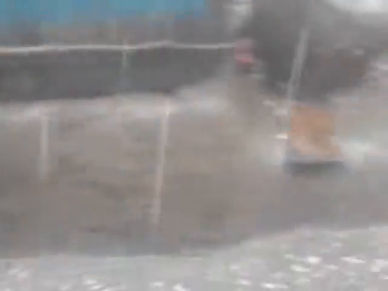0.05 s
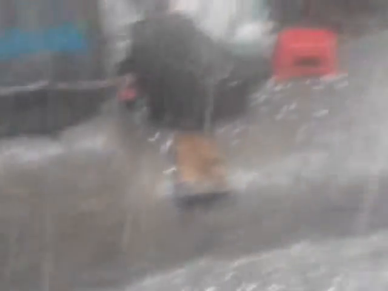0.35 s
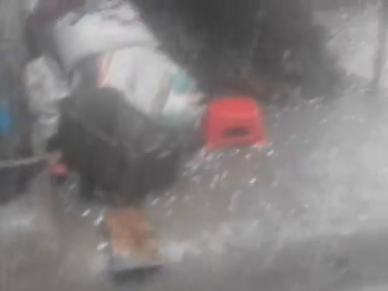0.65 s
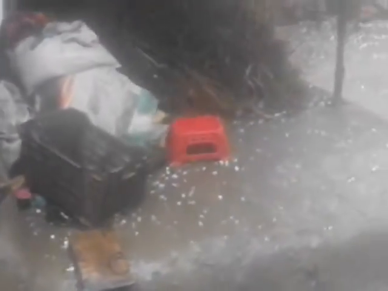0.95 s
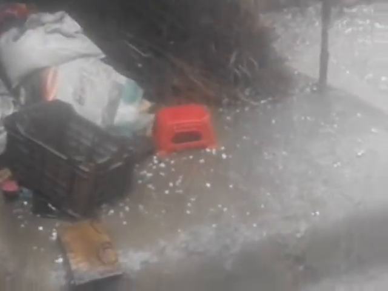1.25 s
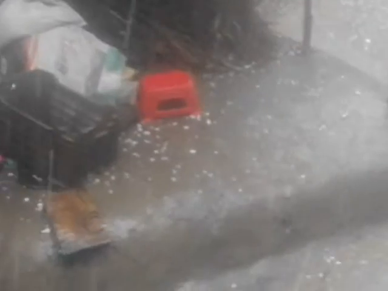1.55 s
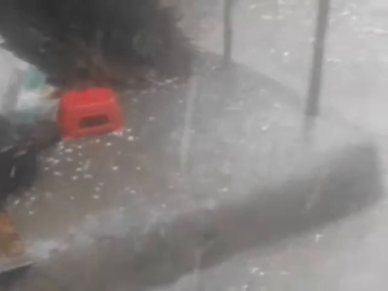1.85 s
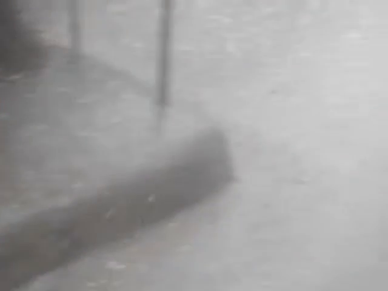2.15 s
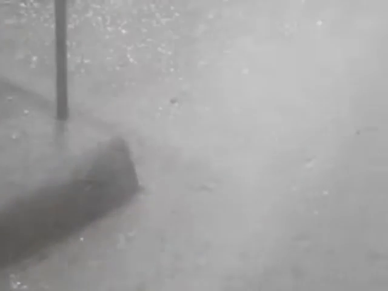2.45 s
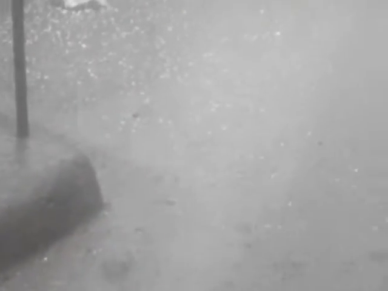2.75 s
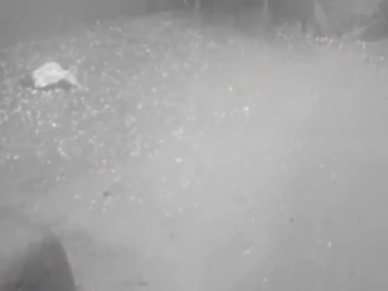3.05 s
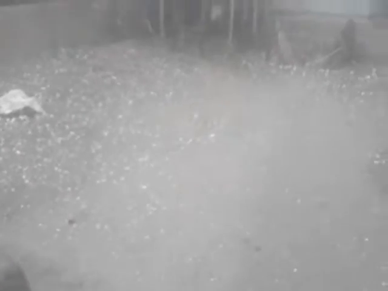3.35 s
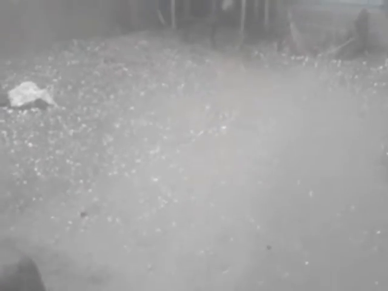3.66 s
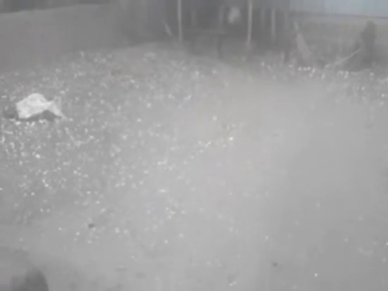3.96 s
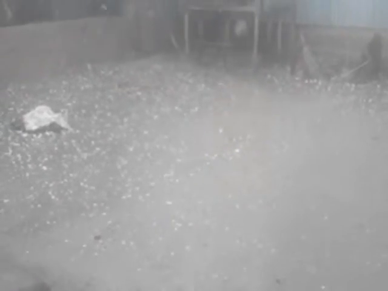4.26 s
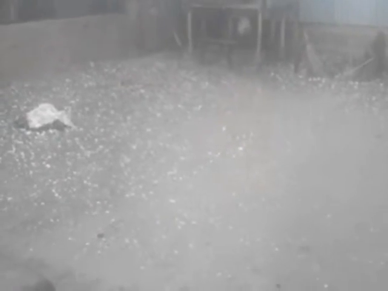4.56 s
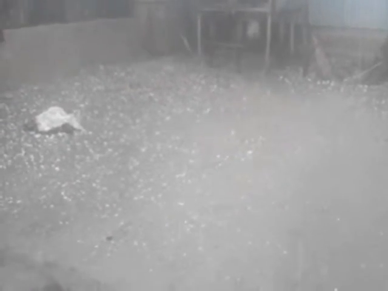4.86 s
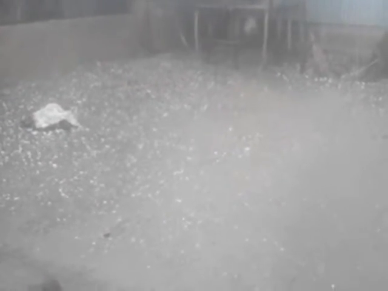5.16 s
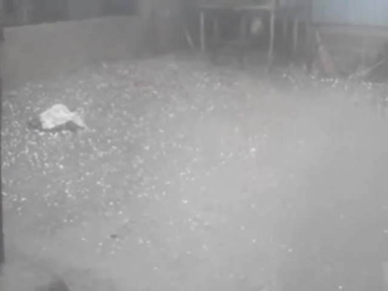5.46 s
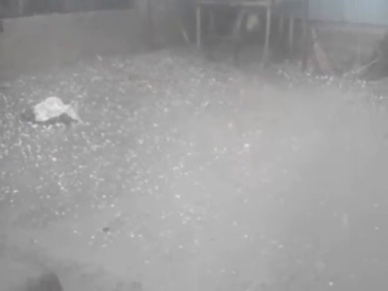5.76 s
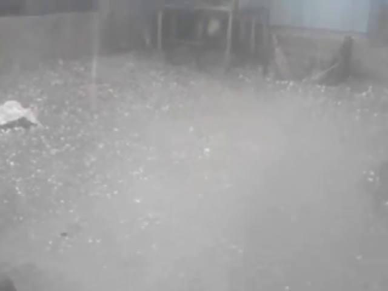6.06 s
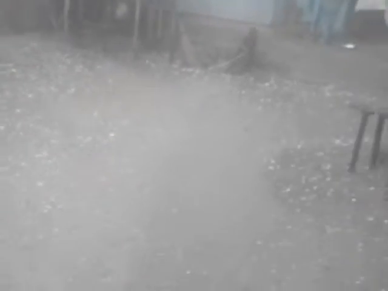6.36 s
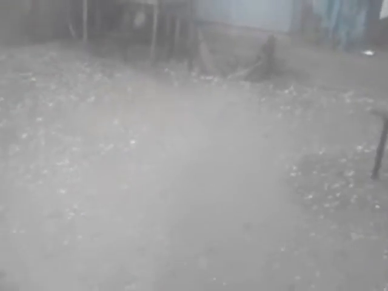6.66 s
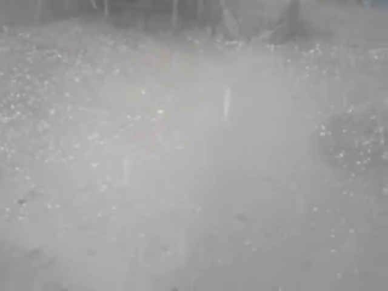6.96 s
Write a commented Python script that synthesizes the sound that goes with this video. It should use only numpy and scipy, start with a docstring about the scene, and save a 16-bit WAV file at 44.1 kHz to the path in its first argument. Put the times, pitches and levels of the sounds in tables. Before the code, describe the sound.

A dense, bright hiss of hail and rain on wet paving, with nearby hailstones ticking, splashing and knocking on crates and boards.

```python
"""Hail on a flooded yard

A cloudburst of hail and rain on flooded paving, heard from under the eaves. Far stones merge into
a roar; nearer ones tick on the paving, plop in the water, splash in sprays and knock on crates and
boards. The small microphone's port resonates near 4 kHz and turns it all into a bright sizzle."""
import sys
import numpy as np
from scipy import signal
from scipy.fft import rfft, irfft
from scipy.io import wavfile
from scipy.ndimage import uniform_filter1d, minimum_filter1d

SR = 44100
rng = np.random.default_rng(int(sys.argv[2]) if len(sys.argv) > 2 else 0)


def materialize(psi):
    """Save the field psi as 16-bit PCM at rate SR to the path in sys.argv[1].

    A 1-D psi becomes a single channel; in a 2-D psi each row is a channel.
    """
    bounded = np.clip(np.atleast_2d(psi).T, -1, 1)
    quanta = np.round(bounded * 32767).astype(np.int16)
    wavfile.write(sys.argv[1], SR, quanta)


N = 313992

# how hard it pours, about its usual strength: (time [s], level [dB])
DOWNPOUR = [(0, -0.2), (.85, -1), (1.1, 1.3), (1.7, -0.45), (2.75, -0.5), (3.33, -1.5), (3.65, 0.8),
            (4.0, -0.5), (4.65, -0.5), (5.42, 1.7), (5.58, 0.1), (6.2, 0.5), (6.9, 1.0), (7.12, -2.4)]
# big stones shattering on the paving close by: (time [s], level [dB])
STONES = [(.047, -11), (0.481, -11), (1.125, -12), (1.214, -9.5), (1.521, -8.5), (1.779, -13),
          (2.108, -7.5), (2.29, -12.5), (2.508, -11), (2.841, -9), (3.122, -11), (3.414, -8.5),
          (3.822, -12), (4.057, -11), (4.115, -11), (4.761, -6.5), (4.944, -12), (5.09, -10), (5.658, -12),
          (5.944, -11), (6.24, -10), (6.53, -7), (6.955, -14)]
# near splashes; finer droplets sound higher: (time [s], level [dB], centre [Hz], t60 [s])
SPLASHES = [(.417, -17, 8500, .18), (.546, -10, 12800, .035), (.963, -20, 6500, .15),
            (1.125, -13, 12800, .02), (1.214, -21, 8000, .1), (1.482, -14, 9500, .14),
            (2.04, -11, 10500, 0.19), (2.107, -16, 9500, .1), (2.288, -9, 12000, .02),
            (2.639, -15, 7400, 0.17), (2.68, -17, 7100, .09), (2.755, -13, 9000, .13),
            (3.122, -13.5, 6800, .05), (3.299, -13.5, 8100, .06), (3.737, -13.5, 7700, .06),
            (4.056, -14, 8100, .13), (4.238, -13, 7800, .035), (4.775, -12, 7500, 0.15),
            (4.857, -15, 6800, .054), (4.936, -10, 7600, .088), (4.966, -5, 10800, .023),
            (5.11, -11, 9500, .08), (5.321, -13, 9000, .1), (5.688, -11, 10600, .035),
            (5.901, -10, 9900, 0.066), (6.011, -12, 6800, .06), (6.217, -6.5, 10200, .02),
            (6.47, -16, 9200, .22), (6.825, -13, 10200, .15), (6.877, -9, 11000, .02),
            (6.922, -11, 6400, 0.054)]
# knocks on crates, boards and roofing: (time [s], level [dB], low edge [Hz], high edge [Hz], t60 [s])
KNOCKS = [(.302, -21, 640, 1300, .1), (.704, -15.5, 1270, 1590, .039), (.894, -12, 1210, 3020, 0.031),
          (.97, -21, 800, 2800, 0.31), (1.24, -21, 604, 2200, 0.19), (1.358, -16.5, 280, 3150, 0.15),
          (1.36, -38.5, 60, 220, 0.31), (2.443, -25, 130, 553, .15), (2.54, -17, 700, 2200, .065),
          (2.827, -19, 169, 400, .12), (2.883, -18.5, 250, 1150, .041), (3.42, -18.5, 750, 2000, .22),
          (3.735, -18, 895, 2200, .25), (3.951, -19.5, 400, 910, 0.023), (4.117, -21.5, 1500, 2780, 0.29),
          (5.37, -21, 900, 3000, .28), (5.443, -17.5, 1200, 3460, .2), (5.942, -19, 900, 2500, 0.18),
          (6.33, -20.5, 1200, 2300, .22), (6.383, -14, 1500, 3000, 0.069), (6.41, -23, 150, 900, .13),
          (6.613, -14.5, 277, 2500, 0.23), (6.956, -10.5, 950, 3020, 0.04)]
# hollow things ringing when struck: (time [s], peak level [dB], pitch [Hz], t60 [s])
PINGS = [(3.425, -14, 1150, .045), (4.425, -21, 1500, 0.12), (4.627, -20, 1452, 0.45),
         (4.652, -27, 2150, .25), (5.139, -22, 2110, .15), (5.218, -25, 2070, .35), (5.381, -23, 1420, .14),
         (6.957, -14.5, 1735, .05)]
# spectrum of the ticks on the paving: (frequency [Hz], level [dB])
PATTER_SPECTRUM = [(500, -20.5), (1000, -2), (2200, -5), (2900, -2.5), (3600, 0), (4300, -1), (4900, -1),
                   (5800, -4.5), (9500, -6.5), (15000, -17.5)]
# spectrum of the fine droplets: (frequency [Hz], level [dB])
SPRAY_SPECTRUM = [(3000, -26), (5500, -5), (7500, 0), (9500, 6), (11000, 2.5), (12500, 4), (15500, -11)]
# spectrum of the distant hail: (frequency [Hz], level [dB])
ROAR_SPECTRUM = [(25, -34), (50, -38), (80, -20.5), (130, -10), (220, -7.5), (330, -2.5), (580, -2),
                 (800, 0.5), (1500, -4), (2200, 0.5), (2700, -4.5), (6000, -14), (14000, -13.5)]
# the port's ring sinks a little as the microphone is turned: (time [s], resonance [Hz])
PORT_RESONANCE = [(0, 4264), (3.0, 4256), (4.2, 4133), (7.12, 4170)]


def patter(per_s, spread_db, clump_db):
    """Hard ticks on the paving in front of the eaves, arriving in clumps."""
    return colour(impacts(per_s, spread_db) * from_db(clump_db * drift(30)), PATTER_SPECTRUM)


def spray(splashes_per_s, fade_s, spread_db):
    """Each small splash sheds a fading shower of fine droplets over a steady mist."""
    showers = fading_energy(impacts(splashes_per_s, spread_db=3.5), fade_s)
    droplets = impacts(7000, spread_db)
    return colour(droplets * np.sqrt(1 + showers / np.mean(showers)), SPRAY_SPECTRUM)


def stones(low_hz, high_hz, t60):
    """Big stones shatter close to the microphone: a hard crack and a short scatter of chips."""
    hits = [(s, db, low_hz, high_hz, t60) for s, db in STONES]
    return near_hits(hits, per_s=2500, wash=.7, contact=2.4)


def splashes(octaves):
    """Each near splash throws droplets over the same span of pitch about its centre."""
    half_span = 2 ** (octaves / 2)
    hits = [(s, db, hz / half_span, hz * half_span, t60) for s, db, hz, t60 in SPLASHES]
    return near_hits(hits, per_s=2500, wash=.61, contact=3.0)


def knocks():
    """Stones strike nearby crates, boards and roofing, each sounding in its own band."""
    return near_hits(KNOCKS, per_s=1800, wash=.53, contact=5.1)


def pings():
    """Each hollow thing rings with one fading tone."""
    out = np.zeros(N + SR)
    t = np.arange(SR // 2) / SR
    for s, peak_db, hz, t60 in PINGS:
        at = round(s * SR)
        out[at:at + len(t)] += from_db(peak_db - 60 * t / t60) * np.sin(2 * np.pi * hz * t)
    return out[:N]


def pellets(per_s, shatter_s):
    """Single ice pellets crack on the paving, each into a short fading crackle."""
    fragments = fading_energy(impacts(per_s, spread_db=4.0), shatter_s)
    crackle = np.sqrt(fragments) * rng.standard_normal(N)
    return rms_one(band(crackle, 1340, 17600, order=2))


def plops(per_s, cycles, spread_db, tilt_db, pitches=40):
    """Stones hitting water and loose things out in the yard ring briefly, each at its own pitch."""
    clicks = impacts(per_s, spread_db)
    pitch_index = rng.integers(0, pitches, N)
    out = np.zeros(N)
    for k, hz in enumerate(np.geomspace(700, 2700, pitches)):
        radius = np.exp(-np.log(1000) * hz / (cycles * SR))  # 60 dB down after that many cycles
        ringing = signal.lfilter([1, 0, -1], resonance(hz, radius), clicks * (pitch_index == k) + 1e-18)
        out += from_db(tilt_db * k / pitches) * ringing
    return rms_one(out)


def roar(flutter_db, octaves=10):
    """Countless far impacts merge; each octave flutters a little on its own."""
    edges_hz = np.geomspace(20, 18000, octaves + 1)
    white = rfft(rng.standard_normal(N))
    octave = np.digitize(np.arange(len(white)) * SR / N, edges_hz[1:-1])
    wash = sum(irfft(white * (octave == k), N) * from_db(flutter_db * drift(12)) for k in range(octaves))
    return colour(wash, ROAR_SPECTRUM)


def yard(x, wet_db, t60, count=14):
    """The direct sound plus dull echoes from the ground, walls and eaves."""
    echoes = np.zeros(N)
    for delay_s in rng.uniform(.003, .06, count):
        lag = int(delay_s * SR)
        echoes[lag:] += x[:N - lag] * from_db(-60 * delay_s / t60)
    return x + from_db(wet_db) * band(echoes, 104, 6000)


def port(x, width_hz, block=2048):
    """The air in the microphone port is a mass on a spring: it rings and shuts out the top."""
    centre_hz = in_time(PORT_RESONANCE)
    radius = np.exp(-np.pi * width_hz / SR)
    state, out = np.zeros(2), np.zeros(N)
    for i in range(0, N, block):
        poles = resonance(centre_hz[i], radius)
        out[i:i + block], state = signal.lfilter([poles.sum()], poles, x[i:i + block], zi=state)
    return out


def limiter(x, ceiling_db, recovery_db_per_s, window=45):
    """The recorder's gain ducks just ahead of each peak over the ceiling and creeps back up."""
    over_db = np.maximum(20 * np.log10(np.abs(x) + 1e-9) - ceiling_db, 0)
    climb_db = recovery_db_per_s * np.arange(N) / SR
    duck_db = np.maximum.accumulate(over_db + climb_db) - climb_db
    return x * from_db(uniform_filter1d(minimum_filter1d(-duck_db, window), window))


def near_hits(table, per_s, wash, contact):
    """One burst a row, in the band where the struck thing sounds."""
    out = np.zeros(N + SR)
    for s, level_db, low_hz, high_hz, t60 in table:
        band_share = (high_hz - low_hz) / (SR / 2)
        hit = band(burst(t60, per_s, wash, contact), low_hz, high_hz) / np.sqrt(band_share)
        at = round(s * SR)
        out[at:at + len(hit)] += from_db(level_db) * hit
    return out[:N]


def burst(t60, per_s, wash, contact):
    """A first contact throws droplets and chips that land ever more weakly; wash is the smooth share."""
    t = np.arange(SR // 2) / SR
    grains = rms_one(impacts(per_s, spread_db=2.5, size=len(t))) + wash * rng.standard_normal(len(t))
    attack = 1 - np.exp(-t / (.02 * t60))
    scatter = grains * attack * from_db(-60 * t / t60) / np.hypot(1, wash)
    scatter[0] = contact
    return scatter


def impacts(per_s, spread_db, size=N):
    """Clicks at random moments: many small, a few large."""
    heights = from_db(spread_db * np.minimum(rng.exponential(1, size), 4))
    return heights * rng.choice([-1, 1], size) * (rng.random(size) < per_s / SR)


def fading_energy(clicks, fade_s):
    """Each click's energy dies away exponentially."""
    return signal.lfilter([1], [1, -np.exp(-1 / (fade_s * SR))], clicks ** 2)


def drift(hz, step=40, settle=2000):
    """Slow random wander with rms 1."""
    radius = np.exp(-2 * np.pi * hz * step / SR)
    noise = rng.standard_normal(N // step + settle + 2)
    slow = signal.lfilter([1], resonance(0, radius), noise)[settle:]
    return np.interp(np.arange(N) / step, np.arange(len(slow)), rms_one(slow))


def resonance(hz, radius):
    """Denominator of a two-pole resonator."""
    return np.array([1, -2 * radius * np.cos(2 * np.pi * hz / SR), radius ** 2])


def band(x, low_hz, high_hz, order=4):
    """Causal band-pass."""
    return signal.sosfilt(signal.butter(order, [low_hz, high_hz], "band", fs=SR, output="sos"), x + 1e-18)


def colour(x, spectrum, size=4096):
    """Minimum-phase filter with the given spectrum; the result has rms 1."""
    hz, level_db = np.transpose(spectrum)
    grid_hz = np.maximum(np.arange(size // 2 + 1) * SR / size, 1)
    gain = from_db(np.interp(np.log(grid_hz), np.log(hz), level_db))
    cepstrum = irfft(np.log(gain))
    cepstrum[1:size // 2] *= 2
    cepstrum[size // 2 + 1:] = 0
    response = irfft(np.exp(rfft(cepstrum)))
    return rms_one(signal.fftconvolve(x, response)[:N])


def in_time(curve):
    """A (time, value) curve at every sample."""
    return np.interp(np.arange(N) / SR, *np.transpose(curve))


def from_db(db):
    """Decibels to gain."""
    return 10 ** (np.asarray(db) / 20)


def rms_one(x):
    """Scale to rms 1."""
    return x / np.sqrt(np.mean(x ** 2) + 1e-20)


def scene():
    """The yard from under the eaves, in mono: one swell drives the downpour and near hits stand out."""
    swell_db = in_time(DOWNPOUR)
    flurry_db = swell_db + .63 * drift(hz=12)  # close by, chance flurries ride on the swell
    far_db, paving_db, spray_db = .6 * swell_db, .94 * flurry_db, .73 * flurry_db
    far = from_db(-25 + far_db) * roar(flutter_db=1.05)
    water = from_db(-32.5 + far_db) * plops(per_s=400, cycles=19, spread_db=3.5, tilt_db=5.5)
    ticks = from_db(-23.5 + paving_db) * patter(per_s=6000, spread_db=2.5, clump_db=.5)
    ice = from_db(-31 + paving_db) * pellets(per_s=70, shatter_s=.0074)
    mist = from_db(-25.5 + spray_db) * spray(splashes_per_s=87, fade_s=.012, spread_db=1.0)
    droplets = from_db(-2.5) * splashes(octaves=1)
    cracks = from_db(-6.5) * stones(low_hz=2500, high_hz=9900, t60=.098)
    hits = cracks + droplets + knocks() + pings() + ice + water
    return (ticks + mist + yard(hits, wet_db=-11.5, t60=.24) + far)[None]


def record(dry):
    """The small microphone's port rings; the recorder thins the bass, limits peaks and cuts the top."""
    low_cut = signal.butter(3, 65, "high", fs=SR, output="sos")
    high_cut = signal.ellip(12, .1, 90, 15750, fs=SR, output="sos")
    thinned = signal.sosfilt(low_cut, port(dry[0], width_hz=737))
    limited = limiter(thinned, ceiling_db=-.5, recovery_db_per_s=58)
    return signal.sosfilt(high_cut, limited)[None]


dry = scene()
out = record(dry)
materialize(out)
```